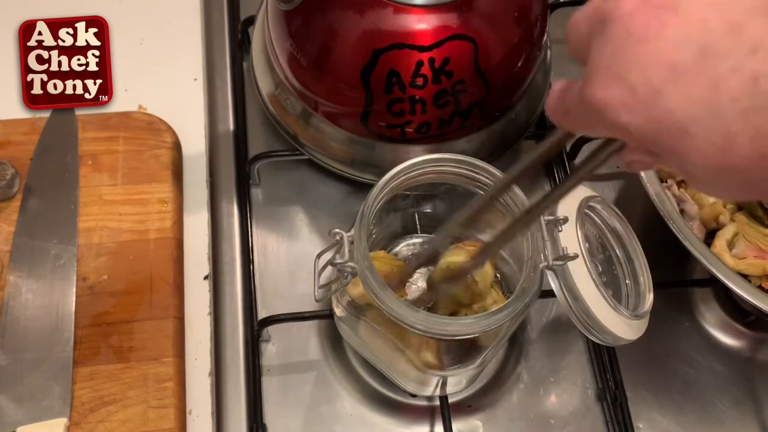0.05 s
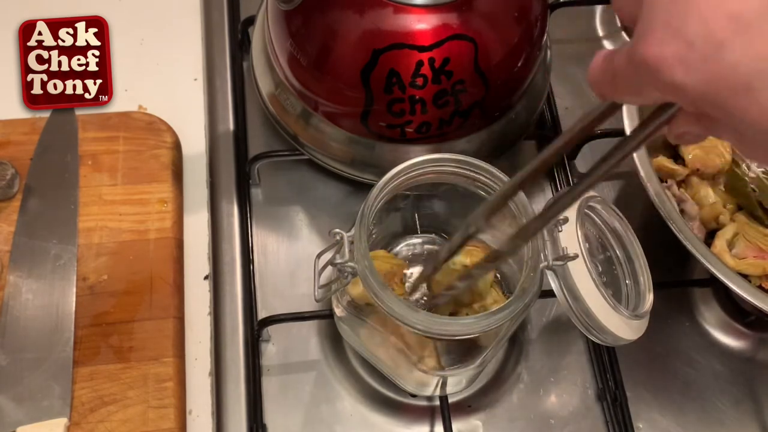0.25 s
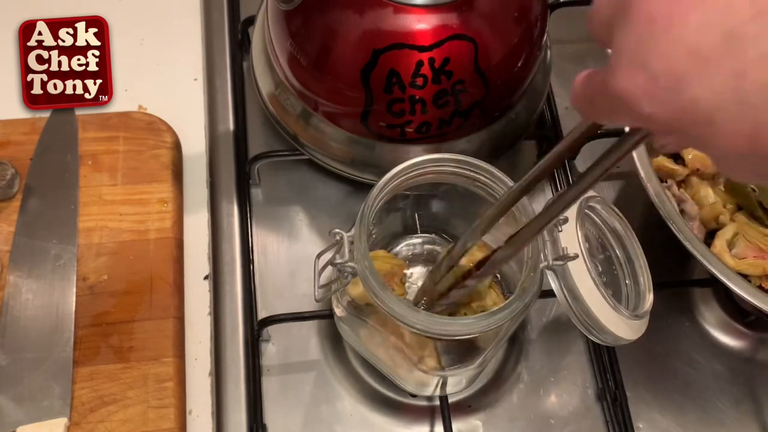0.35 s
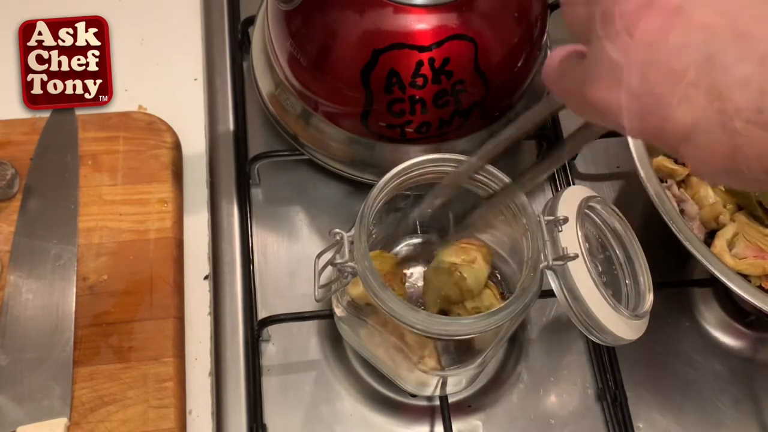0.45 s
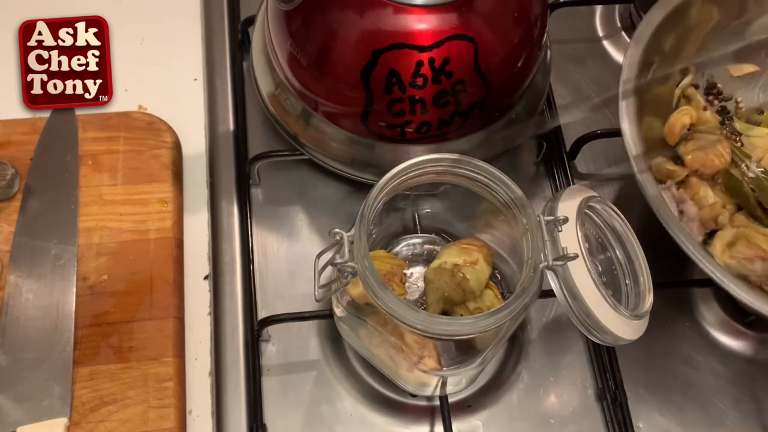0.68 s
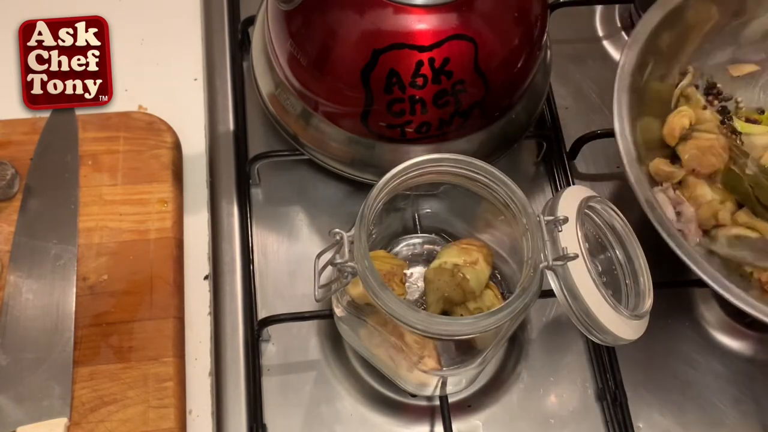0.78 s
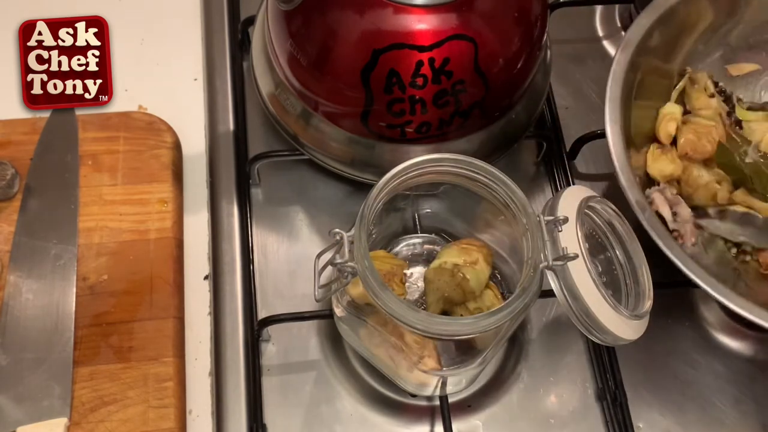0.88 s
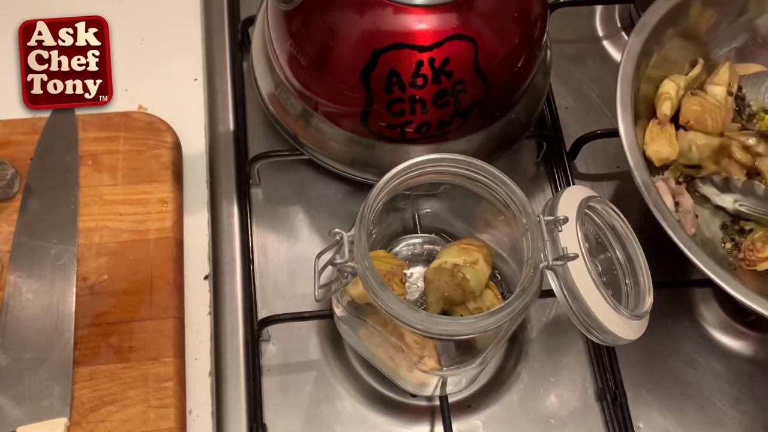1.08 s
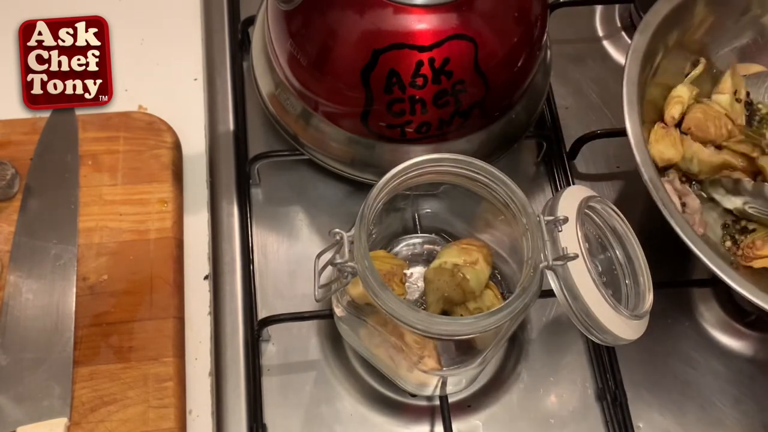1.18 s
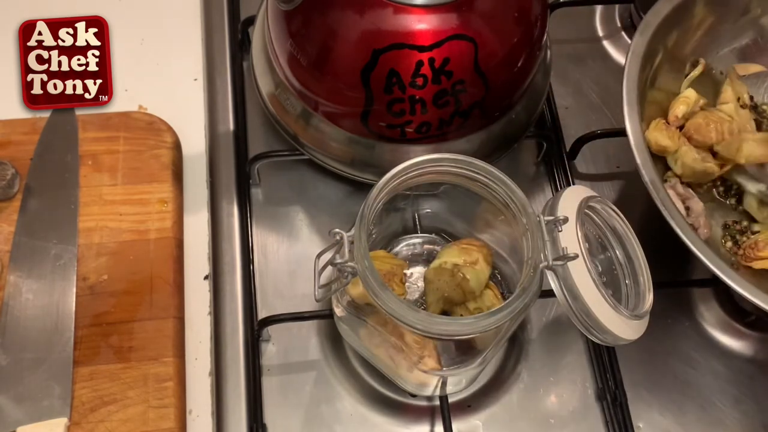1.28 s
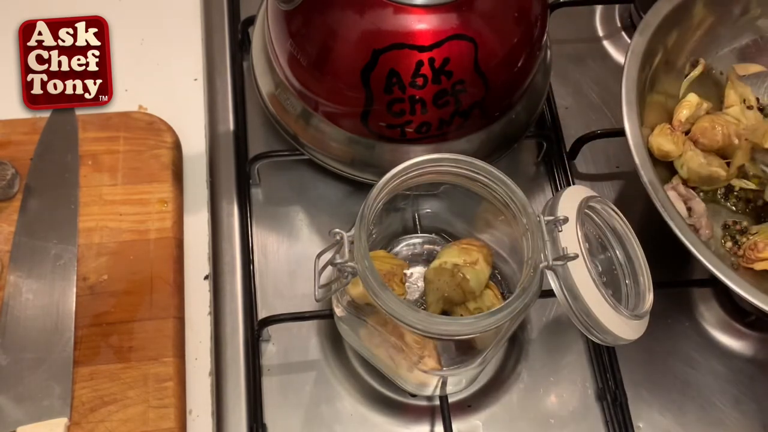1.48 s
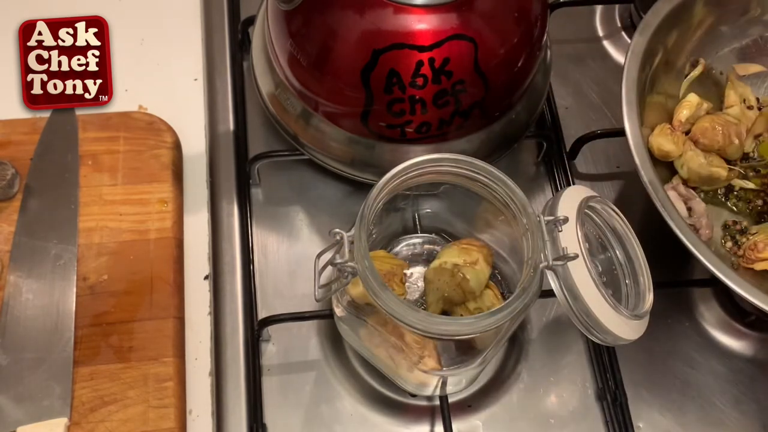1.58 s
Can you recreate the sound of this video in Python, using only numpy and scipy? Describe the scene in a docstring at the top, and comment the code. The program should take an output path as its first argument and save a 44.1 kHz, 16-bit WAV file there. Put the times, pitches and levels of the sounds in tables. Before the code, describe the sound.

Metal tongs click brightly against a glass jar at about 0.2 seconds, with a soft low thump, then chatter harder at 0.38 to 0.44, leaving a faint glass ring. After a short gap, gritty steel scraping starts near 0.63 and runs unevenly to about 1.2, with dull pan knocks from 0.78 and low stove thumps around 1.1. Then near quiet, in a small close-miked kitchen.

```python
"""Steel tongs chatter against a glass jar, then scrape and knock through food in a steel pan on a stove.
Noise ticks ring the steel for the chatter, a few slow sines ring the jar, and uneven grit drives the scrape.
Dying sines make the pan knocks and the stove-top thumps; narrow low noise makes the hum of the stove.
A small kitchen rings back through sparse random taps over faint room tone; two microphone ports hear it."""
import sys
import numpy as np
from scipy import signal
from scipy.fft import rfft, irfft
from scipy.io import wavfile
from scipy.ndimage import uniform_filter1d

SR = 44100
rng = np.random.default_rng(int(sys.argv[2]) if len(sys.argv) > 2 else 0)


def wav_out(sig):
    """Save sig, one row per channel (or a flat mono array), as 16-bit PCM at SR to the path in sys.argv[1]."""
    wavfile.write(sys.argv[1], SR, np.round(np.clip(np.atleast_2d(sig).T, -1, 1) * 32767).astype(np.int16))


N = 72765  # length in samples

# Short bright chatters; the first row is a faint tick just ahead of the two loud ones, the rest are the tongs
# on glass or steel. Each row: start in seconds, level in dB, chatter length in seconds, centre of the bright
# band in Hz, spread of that band in Hz.
CHATTERS = [(0.1945, -34.5, 0.002, 6500, 1510), (0.1995, -14, 0.0055, 6000, 6050),
            (0.2046, -14, 0.0032, 7960, 4930), (0.3822, -27.5, 0.025, 8620, 4320),
            (0.4313, -23.5, 0.0053, 6300, 4400), (0.4428, -12, 0.0052, 9500, 4700),
            (0.691, -34.5, 0.0023, 7000, 1100), (0.779, -28, 0.0058, 7170, 2240),
            (0.996, -40, 0.022, 8400, 3900), (1.119, -48, 0.0089, 8120, 4100),
            (1.181, -42.5, 0.0016, 9150, 4090), (1.364, -52.5, 0.0024, 12590, 1540),
            (1.587, -59.5, .004, 6620, 3880)]
# Short ring of the tongs. Each row: pitch in Hz, relative level in dB.
TONGS_RING = [(2330, -6), (2700, -3), (3370, -3), (3980, -4), (5480, -4), (6160, -2), (6950, 3), (7170, 2),
              (10520, 3), (11500, 2)]
# Colour of the dense clatter in each chatter. Each row: frequency in Hz, relative level in dB.
CLATTER_COLOUR = [(900, -20.5), (3200, -6), (4700, -4.5), (7000, -5.5), (8900, -4), (10800, -3.5),
                  (13300, -8.5), (15000, -8.5)]
# Blows that set the glass ringing. Each row: start in seconds, level in dB.
JAR_BLOWS = [(.4425, -41.5)]
# Slow ring of the glass. Each row: pitch in Hz, relative level in dB, 60 dB decay time in seconds.
JAR_MODES = [(950, -10, .25), (2000, 0, .45), (2100, -4, .3)]
# Tongs dragged over steel. Each row: time in seconds, drag level in dB,
# level of the 2-4 kHz rasp against the rest in dB.
SCRAPE_LEVELS = [(0.0, -69.5, 19.5), (.07, -82.5, 9.5), (.63, -66.5, 12), (.634, -36.5, -22),
                 (.67, -47, -29), (.73, -37.5, -73), (.77, -41.5, 1), (.8, -37, -3.5), (.86, -51.5, 2),
                 (.9, -45, 4), (.95, -43.5, 3), (.98, -53, 2.5), (1.02, -43, -1.5), (1.08, -58.5, 1),
                 (1.13, -56.5, 15.5), (1.2, -51.5, -1.5), (1.29, -77, -18), (1.58, -88, 15.5),
                 (1.6, -78.5, 22), (1.65, -51, -2)]
# Resonances the drag wakes. Each row: centre in Hz, width in Hz, level in dB before the width make-up.
DRAG_RESONANCES = [(630, 45, -23), (1373, 32, -15.5), (2058, 2300, -11.5), (3663, 400, -11.5),
                   (6080, 250, -11.5), (6295, 370, -7.5), (7200, 900, -9), (8500, 1200, -20),
                   (10000, 2500, -8.5)]
# Knocks on the pan wall. Each row: start in seconds, level in dB, favoured pitch in Hz.
PAN_KNOCKS = [(.779, -29, 660), (.925, -32.5, 852), (.956, -34.5, 874), (1.005, -38, 1165),
              (1.084, -40, 840), (1.106, -35.5, 804)]
# Modes of the pan. Each row: pitch in Hz, relative level in dB, 60 dB decay time in seconds.
PAN_MODES = [(716, -3, .1), (790, 0, .06), (930, -1, .055), (1244, -6, .1)]
# Pan rocking on the stove. Each row: start in seconds, level in dB, favoured pitch in Hz.
STOVE_THUMPS = [(0.076, -56, 275), (.202, -47.5, 478.7), (0.21, -38, 187), (0.249, -35.5, 106.7),
                (.388, -49.5, 326.4), (.779, -45, 433), (0.948, -40.5, 116), (.975, -45.5, 330),
                (1.007, -36, 100), (1.1, -28, 309), (1.122, -32.5, 258.7), (1.191, -34, 276),
                (1.234, -42, 212), (1.511, -62.5, 192)]
# Modes of the stove top. Each row: pitch in Hz, relative level in dB, 60 dB decay time in seconds.
STOVE_MODES = [(121, -9.5, 0.083), (168, -6, 0.17), (211, 1.5, 0.12), (325, -6.5, 0.28), (438, -4, 0.24),
               (642, -4, 0.78)]
# Swell of the low stove-top hum. Each row: time in seconds, level in dB.
HUM_LEVELS = [(0.0, -61), (.19, -64.5), (.27, -46.5), (.38, -59), (.62, -74), (.93, -66), (1.03, -55),
              (1.15, -49), (1.21, -45), (1.33, -50.5), (1.45, -76), (1.65, -68.5)]
# Decay of the kitchen. Each row: frequency in Hz, 60 dB decay time in seconds.
KITCHEN_DECAY = [(300, 0.44), (2000, 0.38), (5000, 0.19), (12000, 0.057)]
# Colour of the room tone. Each row: frequency in Hz, relative level in dB per Hz.
AIR_COLOUR = [(30, 0.5), (300, -2.5), (900, -15.5), (1500, -23), (5000, -38), (11000, -27.5),
              (16000, -23.5)]

TICKS_PER_S, FIRST_TICK = 6000, 4.5  # rate of the stronger ticks; height of the first tick in each chatter
RING_T60, CLATTER_T60, CLATTER_DB = .04, .02, 5  # seconds, seconds, clatter against ring
RATTLE_DB, RATTLE_T60 = -19.5, 0.31  # rattle against chatter, seconds
SPOT_DB = 2.0  # random spread of mode levels with the spot struck
GRIT_PER_S, GRIT_DB = 6000, 2.0  # rate of the stronger grains; dB scale of their random lift
PAN_FOCUS_DB, STOVE_FOCUS_DB = 90, 22  # loss of a mode one octave from the favoured pitch
BLOW_RISE_S = .003
HUM_HZ, HUM_WIDTH_HZ = 65, 12
AIR_DB = -69
WET_DB, WET_SAME = -11.0, .5  # kitchen level; likeness of its taps at the two ports, 0 to 1
PORT_LAG_S, PORT_FLIP_HZ = 0.0002234, 500
EDGE_HZ = 16200  # upper band limit


def amp(db):
    """Gain of a level in dB."""
    return 10 ** (np.asarray(db) / 20)


def evened(x):
    """Scale to an RMS of 1."""
    return x / np.sqrt(np.mean(x ** 2) + 1e-20)


def read(points, hz):
    """Read a frequency table along a logarithmic pitch axis."""
    f, value = np.transpose(points)
    return np.interp(np.log(hz + 1), np.log(f + 1), value)


def curve(points, column=1):
    """Draw one column of a time table as straight lines over the scene."""
    rows = np.array(points)
    return np.interp(np.arange(N) / SR, rows[:, 0], rows[:, column])


def add(mix, s, sound):
    """Lay a sound into the mix at a time in seconds."""
    part = mix[round(s * SR):][:len(sound)]
    part += sound[:len(part)]


def shaped(x, gain):
    """Filter by a gain given as a function of Hz."""
    return irfft(rfft(x) * gain(np.fft.rfftfreq(len(x), 1 / SR)), len(x))


def fade(length, t60):
    """Decay by 60 dB in t60 seconds, over a length in samples."""
    return amp(-60 * np.arange(length) / SR / t60)


def resonate(x, hz, width_hz):
    """Two-pole resonance of gain about 1."""
    r = np.exp(-np.pi * width_hz / SR)
    return signal.lfilter([1 - r, 0, r - 1], [1, -2 * r * np.cos(2 * np.pi * hz / SR), r * r], x)


def struck(modes, spot_db, split):
    """Dying sines, each a close cluster of three; where the blow lands changes their balance."""
    t = np.arange(SR // 2) / SR
    spot = rng.standard_normal((len(modes), 4))
    ring = np.zeros(len(t))
    for (hz, db, t60), s in zip(modes, spot):
        pitches = hz * (1 + split * s[1:, None])
        cluster = np.sin(2 * np.pi * pitches * t).sum(0) / 2
        ring += amp(db + spot_db * s[0] - 60 * t / t60) * cluster
    return ring


def tick_chatter(level_db, length, centre_hz, spread_hz):
    """Chatter ticks each set off a dense clatter and the short steel ring; a loose rattle trails after."""
    t = np.arange(1024) / SR
    strength = .5 + (rng.random(1024) < TICKS_PER_S / SR)
    ticks = rng.standard_normal(1024) * strength * (t < length) * np.exp(-t / length)
    ticks[0] = FIRST_TICK

    def colour(hz):
        return amp(read(CLATTER_COLOUR, hz))

    def bright(hz):
        return np.exp(-.5 * ((hz - centre_hz) / spread_hz) ** 2) * hz / (hz + 1200)

    ring = struck([(hz, db, RING_T60) for hz, db in TONGS_RING], SPOT_DB, split=.012)
    clatter = rng.standard_normal(len(ring)) * fade(len(ring), CLATTER_T60)
    body = evened(ring) + amp(CLATTER_DB) * evened(shaped(clatter, colour))
    # a short lead-in keeps the filter's pre-ring from wrapping round to the end
    chatter = np.pad(signal.fftconvolve(ticks, body), (64, 0))
    chatter = shaped(chatter, bright)[64:64 + SR // 2]
    chatter /= np.sqrt(np.mean(chatter[:round(length * SR)] ** 2))

    noise = rng.standard_normal(len(chatter))
    rattle = evened(shaped(noise, lambda hz: bright(hz) * colour(hz)))
    rattle *= amp(RATTLE_DB) * fade(len(chatter), RATTLE_T60)
    return amp(level_db) * (chatter + rattle)


def jar_ring(level_db):
    """A blow leaves the glass ringing in a few slowly dying modes."""
    return amp(level_db) * struck(JAR_MODES, 1, split=.012)


def tongs_scrape():
    """Dense uneven grit through the resonances of tongs and pan."""
    lift = amp(GRIT_DB * np.minimum(rng.exponential(1, N), 4))
    grains = lift * (rng.random(N) < GRIT_PER_S / SR)
    grit = rng.standard_normal(N) * (.5 + grains)
    wander_db = 2.0 * evened(uniform_filter1d(rng.standard_normal(N), 200))
    grit *= amp(wander_db + curve(SCRAPE_LEVELS)) / np.std(grit)
    rasp = grit * amp(curve(SCRAPE_LEVELS, column=2))
    drag = np.zeros(N)
    for hz, width_hz, db in DRAG_RESONANCES:
        source = rasp if 1600 < hz < 5000 else grit
        # narrow resonances pass less noise, so they are made up by their width
        drag += amp(db) * resonate(source, hz, width_hz) * np.sqrt(900 / width_hz)
    return 3.0 * drag


def soft_blow(modes, focus_db, level_db, favoured_hz):
    """A soft contact rises gently and wakes mostly the modes near its favoured pitch."""
    near = [(hz, db - focus_db * np.log2(hz / favoured_hz) ** 2, t60) for hz, db, t60 in modes]
    ring = struck(near, 2, split=.025)
    rise = 1 - np.exp(-np.arange(len(ring)) / SR / BLOW_RISE_S)
    return amp(level_db) * ring * rise


def pan_knock(level_db, favoured_hz):
    """A knock on the pan wall wakes a tight group of short steel modes."""
    return soft_blow(PAN_MODES, PAN_FOCUS_DB, level_db, favoured_hz)


def stove_thump(level_db, favoured_hz):
    """The rocking pan wakes a broad group of low modes in the stove top."""
    return soft_blow(STOVE_MODES, STOVE_FOCUS_DB, level_db, favoured_hz)


def stove_hum():
    """Low noise narrowed by two resonances, steadied, then swelled along its level table."""
    narrow = resonate(rng.standard_normal(N), HUM_HZ, HUM_WIDTH_HZ)
    narrow = resonate(narrow, HUM_HZ, 2 * HUM_WIDTH_HZ)
    power = uniform_filter1d(narrow ** 2, 3000)
    steady = narrow / np.sqrt(power + .1 * np.mean(narrow ** 2))
    return amp(curve(HUM_LEVELS)) * evened(steady)


def kitchen(x):
    """Sparse taps of random sign, each band dying at its own speed."""
    taps = np.zeros((2, SR // 2))
    slots = np.arange(200, SR // 2 - 20, 20)
    at = slots + rng.integers(0, 20, (2, len(slots)))
    signs = rng.choice([-1., 1.], (2, len(slots)))
    np.put_along_axis(taps, at, signs, 1)
    taps[1] = WET_SAME * taps[0] + np.sqrt(1 - WET_SAME ** 2) * taps[1]
    hz, t, bands = signal.stft(taps, SR, nperseg=256)
    bands = bands * amp(-60 * t / read(KITCHEN_DECAY, hz)[:, None])
    tail = signal.istft(bands, SR, nperseg=256)[1]
    return signal.fftconvolve(x[None], tail / np.linalg.norm(tail[0]), axes=1)[:, :N]


def room_tone():
    """Faint coloured noise, partly alike at both ports."""
    a, b = rng.standard_normal((2, N))
    ports = [shaped(v, lambda hz: amp(read(AIR_COLOUR, hz))) for v in (a, 0.52 * a + 1.2 * b)]
    return amp(AIR_DB) * evened(np.array(ports))


def scene():
    """Place every chatter, knock and thump, then add the kitchen and the room tone."""
    tongs, pan, stove = tongs_scrape(), np.zeros(N), np.zeros(N)
    for s, *row in CHATTERS:
        add(tongs, s, tick_chatter(*row))
    for s, db in JAR_BLOWS:
        add(tongs, s, jar_ring(db))
    for s, *row in PAN_KNOCKS:
        add(pan, s, pan_knock(*row))
    for s, *row in STOVE_THUMPS:
        add(stove, s, stove_thump(*row))
    # the pan leans to the right port, the stove to the left
    near = tongs + pan * amp([[-2.5], [2.5]]) + (stove + stove_hum()) * amp([[1.1], [-1.1]])
    return near + amp(WET_DB) * kitchen(tongs + 1.8 * pan + .6 * stove) + room_tone()


def record(dry):
    """The right port hears all but the bass late and inverted; then the band limit."""
    def flip(hz):
        late_inverted = np.pi - 2 * np.pi * hz * PORT_LAG_S
        above_bass = hz ** 2 / (hz ** 2 + PORT_FLIP_HZ ** 2)
        return np.exp(1j * late_inverted * above_bass)

    right = shaped(np.pad(dry[1], (0, 2047)), flip)[:N]
    ports = np.array([dry[0], right])
    low_pass = signal.firwin(255, EDGE_HZ, window=("kaiser", 9), fs=SR)
    return signal.oaconvolve(ports, low_pass[None], "same")


dry = scene()
out = record(dry)
wav_out(out)
```